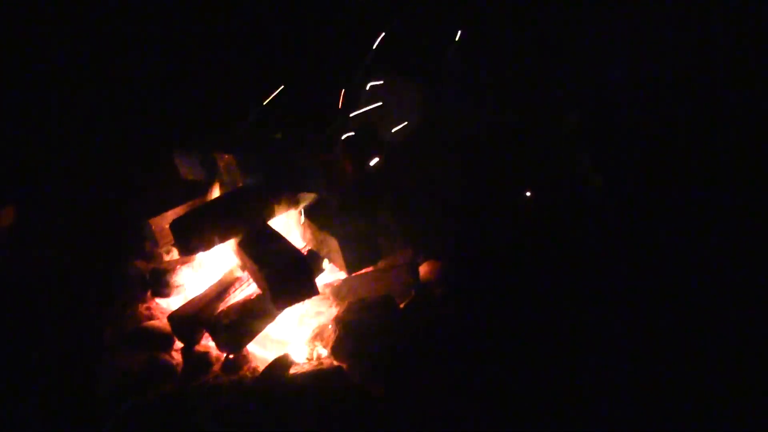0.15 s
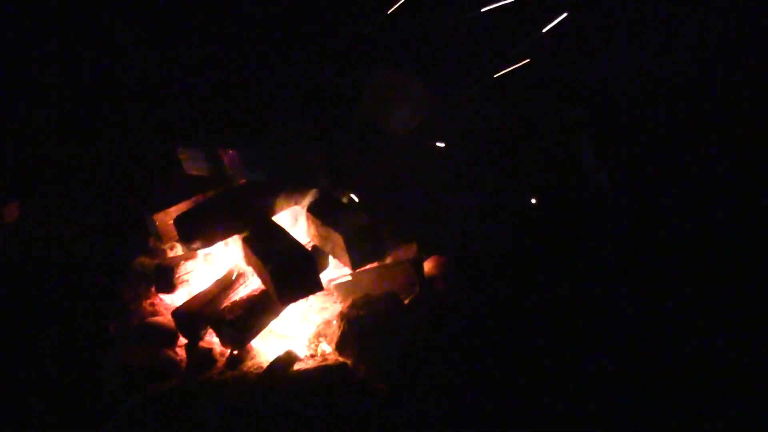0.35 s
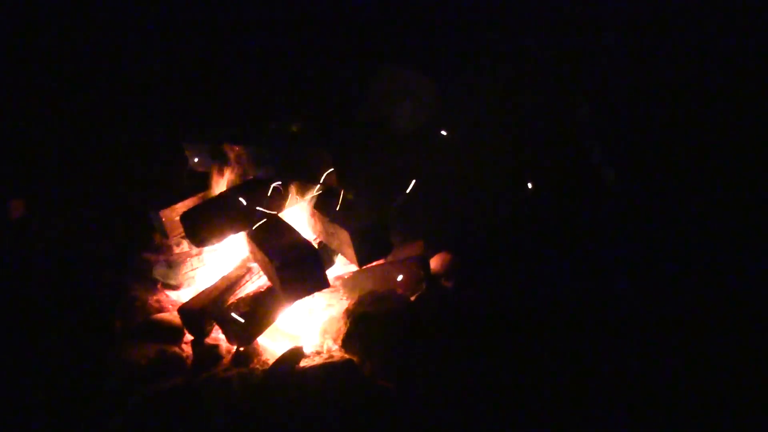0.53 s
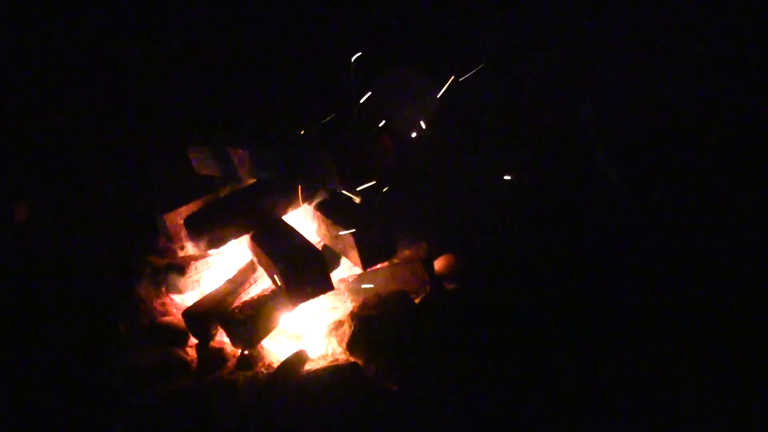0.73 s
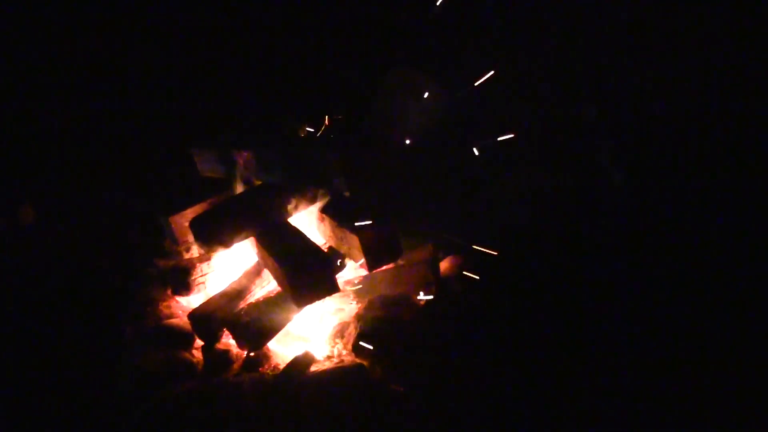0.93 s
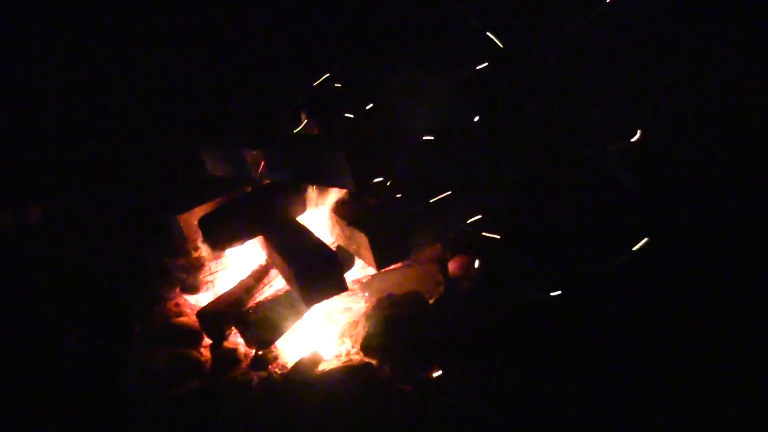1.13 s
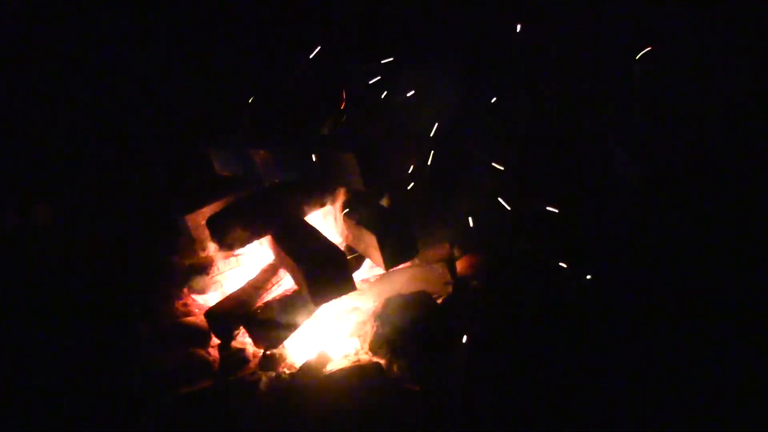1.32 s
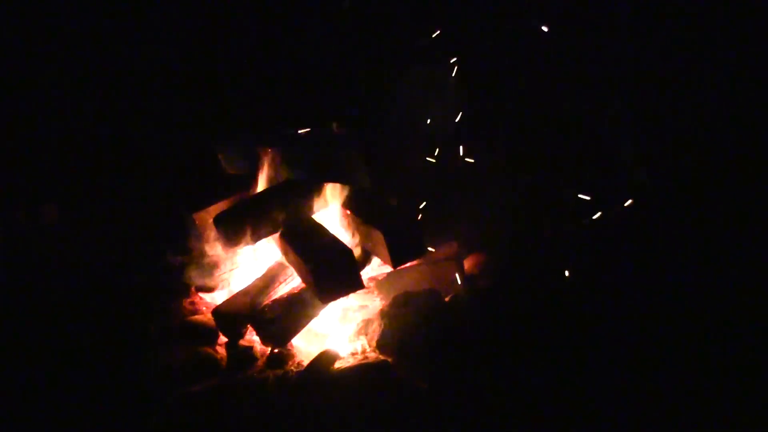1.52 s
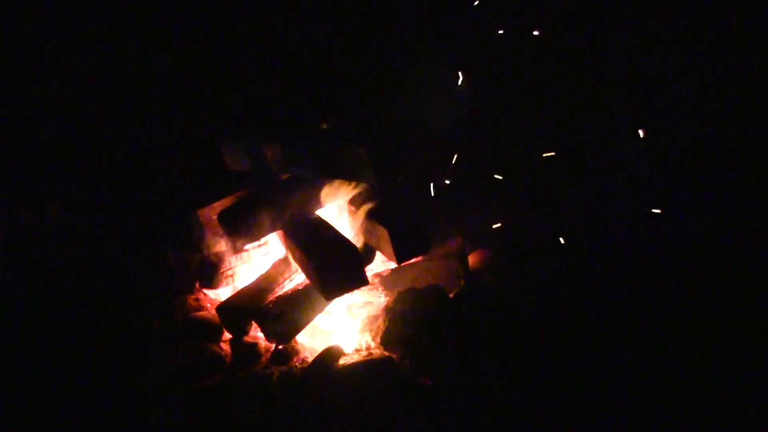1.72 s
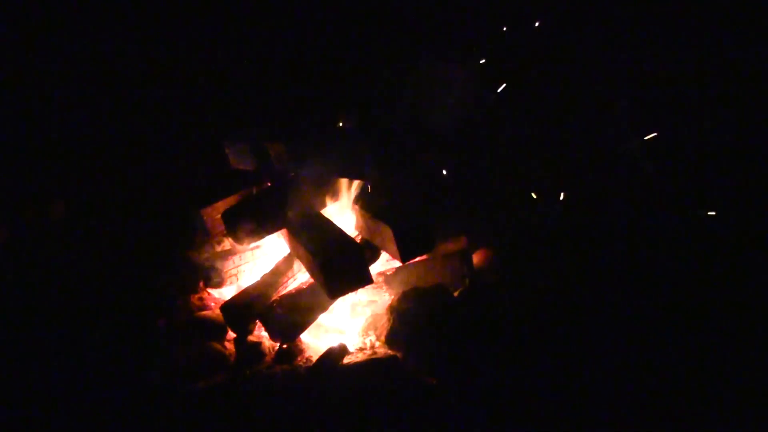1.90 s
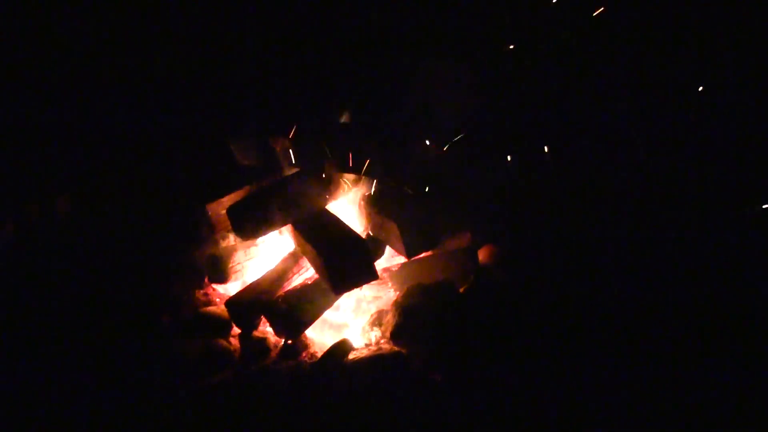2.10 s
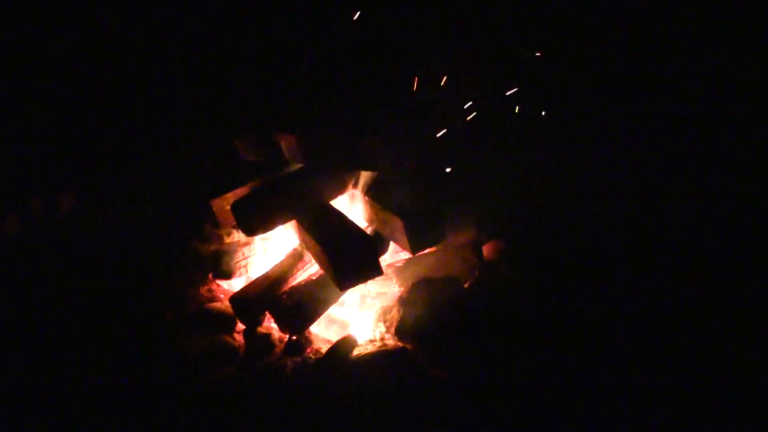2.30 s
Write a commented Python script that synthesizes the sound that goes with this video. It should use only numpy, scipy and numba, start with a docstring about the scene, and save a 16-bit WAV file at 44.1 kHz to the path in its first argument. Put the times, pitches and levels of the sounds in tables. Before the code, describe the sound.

A night campfire crackles with irregular sharp pops, two very loud, over a soft low roar

```python
"""A campfire at night, a couple of metres from a stereo camera. Logs pop and tick: each burst is a filtered click
that bounces in the hollow between the logs, plus other filtered clicks and noise; the burst comes back once
from a surface nearby and leaves a short scattered tail. Bands of noise make a low flame roar with a faint
treble hiss, and a wavering, whistle-like hiss of sap. A short run of dull knocks is made of decaying sines."""
import sys
import numpy as np
from scipy import signal
from scipy.fft import rfft, irfft
from scipy.io import wavfile
from scipy.ndimage import uniform_filter1d, map_coordinates
from numba import njit

SR = 44100
rng = np.random.default_rng(int(sys.argv[2]) if len(sys.argv) > 2 else 0)


def rack_gain(trim_db):
    """Turn a fader trim in dB into the linear factor to multiply a signal by."""
    fader = np.asarray(trim_db, float)
    return 10 ** (fader / 20)


def file_out(sig):
    """Save sig as 16-bit WAV at sys.argv[1]."""
    # one column per channel
    cols = np.atleast_2d(sig).T
    # limit, then scale
    lim = np.clip(cols, -1, 1)
    pcm = np.round(lim * 32767).astype(np.int16)
    wavfile.write(sys.argv[1], SR, pcm)


N = 103635  # length in samples

# steady fire, relative spectrum: pitch_hz, density_db (per Hz)
FIRE_SPECTRUM = [(18, -70), (30, -48), (50, -34), (66, -22), (84, -6.5), (107, -3), (223, 5), (255, -2.5),
                 (340, -9), (399, -10), (641, -10.5), (1120, -20.5), (2160, -13), (2670, -17.5),
                 (5300, -30), (11100, -30.5), (14100, -44), (16500, -65)]
# stereo spread of the steady sounds: pitch_hz, side_minus_mid_db
SIDE_SPREAD = [(60, -22), (110, -22.5), (200, -20), (380, -19), (700, -9), (1290, -8), (2380, -12),
               (4400, -4.5), (8120, -8), (15000, -8)]
# resonances in the roar and hiss: pitch_hz, width_hz, level_db (before they swell and waver)
ROAR_RESONANCES = [(76, 5.9, -57.5), (151, 5.7, -62.5), (190, 10, -61), (342.2, 14.3, -55.5),
                   (497.7, 39, -60), (622, 86, -59), (3282, 16, -70)]
# how those resonances swell and sink: time_s, gain_db
ROAR_SWELL = [(0, -1), (.5, 0), (.8, 2.5), (.9, 6), (1.08, 3), (1.25, -1), (1.5, -1.5), (1.7, 1), (1.95, 3),
              (2.1, 1), (2.35, 0.5)]
# sap hiss, before its random wavering: time_s, centre_hz, gain_db
SAP_PATH = [(0, 2190, -56), (.13, 2310, -50), (.18, 2100, -56.5), (.35, 2140, -56), (.5, 2200, -54),
            (.6, 2270, -57), (.66, 2400, -51.5), (.74, 2200, -58), (.95, 2230, -52), (1.08, 2260, -50),
            (1.12, 2140, -54.5), (1.25, 2120, -49.5), (1.325, 2140, -65), (1.34, 2210, -42),
            (1.39, 2200, -51.5), (1.45, 2120, -57), (1.53, 2040, -54), (1.7, 2270, -51), (1.98, 2420, -51),
            (2.05, 2210, -52.5), (2.35, 2330, -48.5)]
# bursts, layer peaks before bounces and filters: start_s, pop_db, pop_pitch_hz, thump_db, crack_db,
# crack_centre_hz, fizz_db, fizz_centre_hz, echo_and_tail_send_db
BURSTS = [(0.2045, -17.5, 1593, -22.5, -23, 3800, -26.5, 5800, -9.5),
          (0.376, -51, 1610, -72, -47.5, 4300, -47, 7600, -3),
          (0.4299, -3.5, 1640, -25.5, -15, 4500, -11.5, 6400, -2),
          (0.535, -53, 1600, -72, -39.5, 4560, -53, 6800, -4),
          (0.5473, -54, 1590, -70, -47, 4500, -41, 9200, 2),
          (0.567, -47, 1560, -69, -43, 4600, -43.5, 7500, -1),
          (.8590, -47, 1510, -66, -40.5, 4400, -46, 7500, -7),
          (0.8868, -24, 1567, -32.5, -22, 2730, -28, 7360, 1),
          (1.098, -50, 1600, -68, -54, 11600, -51.5, 9000, 0),
          (1.322, -61, 1600, -80, -48, 13200, -55, 8950, 0),
          (1.4570, -29, 1450, -32, -23.5, 3260, -23, 8950, 5),
          (1.545, -59, 1590, -80, -50, 7000, -57, 10000, 0),
          (1.7092, -50, 1600, -75, -45.5, 6440, -53, 11000, -3),
          (1.7154, -52, 1610, -68, -34.5, 4400, -34, 8800, 2.5),
          (1.828, -39, 1400, -56, -37, 4260, -39, 10500, -23.5),
          (1.9467, -32.5, 1504, -47, -25.5, 4100, -26.5, 10200, -1.5),
          (2.0082, -50, 1570, -65, -45.5, 4430, -44.5, 9400, 0),
          (2.0805, -8.5, 1612, -27, -7, 2580, -4.5, 7500, -5.5),
          (2.225, -62, 1590, -70, -48, 4550, -60.5, 7500, 9),
          (2.339, -51, 1600, -59, -45, 5200, -33, 8000, 9)]
# bounces in the hollow between the logs: delay_round_trips (one lasts 1 / pop_pitch_hz), gain_db
HOLLOW_BOUNCES = [(0, 5), (1.001, -1), (2.015, -4.5), (2.975, -14.5), (3.64, -19)]
# scattered tail: centre_hz, width_hz, gain_db, t60_s
SCATTER_TAIL = [(2200, 1800, -32, 0.1), (3970, 1100, -32.5, 0.18), (8000, 3500, -37, 0.076),
                (5900, 5100, -23, 0.0093)]
# lean of the bursts: pitch_hz, left_minus_right_db
LEFT_LEAN = [(500, .1), (1200, .5), (2400, 1.2), (5000, 4.5), (9000, 3.4), (14000, 4)]
# phase lead of the bursts on the left: pitch_hz, lead_radians
LEFT_LEAD = [(500, 0.18), (1500, 0.29), (3000, 0.51), (5000, 1), (8000, 0.061), (14000, 0.22)]
# dull knocks: start_s, peak_db (before the bass cut), brightness_db_per_octave
KNOCKS = [(1.558, -30, 1), (1.603, -31, -3), (1.645, -30, -1), (1.693, -32, -.5), (1.713, -38, 2),
          (1.742, -35, 0), (1.762, -38, 1)]
# what a knock rings with, before each knock's own detuning and brightness: pitch_hz, gain_db, t60_s
LOG_MODES = [(147.6, -8, 0.045), (200, 0, 0.035), (339, -7.5, 0.05), (560, 1.5, 0.085), (816, -10, 0.024),
             (1187, -10, 0.038)]

FIRE_DB = -47.5  # rms of the roar before its resonances
SAP_WIDTH_HZ = 200
POP_Q, CRACK_Q, FIZZ_Q = 1.26, 1.48, 1
CRACK_HOLD_S, CRACK_FALL_S = 0.0013, 0.0014  # noise holds, then decays with this time constant
THUMP_HZ, THUMP_WIDTH_HZ = 820, 480
RING_HZ, RING_WIDTH_HZ, RING_DB = 2330, 260, -8  # a log rings with each pop, dB against pop_db
SNAP_HZ, SNAP_WIDTH_HZ, SNAP_DB = 4400, 520, -5  # splinters ring with each crack, dB against crack_db
TICKS_PER_S, TICK_DB = 30, -56  # average rate, gain of the faintest clicks before filtering
TOP_HZ = 13400  # treble limit of the direct bursts and the tail
ECHO_S, ECHO_DB, ECHO_HZ = 0.0200, -16.5, 2700


def read(table, hz):
    """Reads a table's second column at hz, on a log frequency axis."""
    t = np.array(table, float)
    return np.interp(np.log(np.maximum(hz, 1)), np.log(t[:, 0]), t[:, 1])


def level(x, db):
    """Scales to an rms level."""
    return x * rack_gain(db) / np.sqrt(np.mean(x ** 2))


def peak(x, db):
    """Scales to a peak level."""
    return x * rack_gain(db) / np.abs(x).max()


@njit
def svf(x, hz, width):
    """State-variable band-pass with a moving centre."""
    y, b, l = np.empty(len(x)), 0., 0.
    for i in range(len(x)):
        g, k = np.tan(np.pi * hz[i] / SR), width / hz[i]
        v = (b + g * (x[i] - l)) / (1 + g * (g + k))
        b, l, y[i] = 2 * v - b, l + 2 * g * v, k * v
    return y


def band(x, hz, width_hz):
    """Band-pass at a fixed or moving centre."""
    centre = np.minimum(hz, .4 * SR) * np.ones(len(x))
    return svf(x + 1e-18, centre, 1. * width_hz)


def twice(x, hz, first_width_hz, second_width_hz):
    """Two band-passes in a row, for steeper skirts."""
    return band(band(x, hz, first_width_hz), hz, second_width_hz)


def walk(rate):
    """Random levels held 1 / rate s and slewed twice."""
    k = int(SR / rate)
    steps = np.repeat(rng.standard_normal(N // k + 1), k)
    return 1.3 * uniform_filter1d(uniform_filter1d(steps, k), k)[:N]


def add(out, x, s):
    """Mixes x in at s seconds."""
    i = int(s * SR)
    out[i:i + len(x)] += x[:N - i]


def delay(x, s):
    """Delays by s seconds, between samples if need be."""
    return map_coordinates(x, [np.arange(len(x)) - s * SR], order=3)


def pair(make, hz):
    """Left and right from two unrelated noises, one as mid and one as side."""
    mid, side = make(rng.standard_normal(N)), make(rng.standard_normal(N))
    return mid + rack_gain(read(SIDE_SPREAD, hz)) * side * np.array([[1], [-1]])


def flames():
    """Third-octave noise bands that swell together and flicker alone, with a few resonances in the roar."""
    out, swell = 0, walk(0.5)
    for hz in 25 * 2 ** np.arange(0, 9.4, 1 / 3):
        noise = pair(lambda n: twice(n, hz, hz / 3, hz / 3), hz)
        gain_db = read(FIRE_SPECTRUM, hz) + .5 * swell + 1.2 * walk(9)
        out = out + rack_gain(gain_db) * noise
    out = level(out, FIRE_DB)
    shared_swell_db = np.interp(np.arange(N) / SR, *np.array(ROAR_SWELL).T)
    for hz, width_hz, db in ROAR_RESONANCES:
        resonance = level(pair(lambda n: band(n, hz, width_hz), hz), db)
        out = out + rack_gain(walk(5.1) + shared_swell_db) * resonance
    return out


def sap():
    """Steam hisses from a log end in one narrow, wandering band."""
    rows = np.array(SAP_PATH)
    hz, db = (np.interp(np.arange(N) / SR, rows[:, 0], c) for c in rows.T[1:])
    hz = hz * (1 + 0.02 * walk(12.8))
    hiss = pair(lambda n: twice(n, hz, SAP_WIDTH_HZ, 2 * SAP_WIDTH_HZ), 1460)
    return rack_gain(db + 1.3 * walk(22)) * level(hiss, -2.9)


def ticks():
    """Faint clicks at random moments and strengths, through a broad treble band."""
    hit = rng.random(N) < TICKS_PER_S / SR
    strength = rack_gain(7.3 * rng.exponential(size=N))
    return rack_gain(TICK_DB) * band(hit * strength, 6500, 8000)


def bursts():
    """A suction pulse bouncing between the logs, a thump, a splintering crack and a fizz, with faint ticks.
    Also gives what heads for the echoing surface, and the coloured clicks the surroundings scatter."""
    cracks, sent, clicks = np.zeros(N), np.zeros(N), np.zeros(N)
    t = np.arange(400) / SR
    fade = np.exp(-np.maximum(t - CRACK_HOLD_S, 0) / CRACK_FALL_S)
    noise = rng.standard_normal((len(BURSTS), 2, len(t))) * fade
    click = -1. * (t == 0)  # negative: suction
    ring = peak(twice(click, RING_HZ, RING_WIDTH_HZ, 2 * RING_WIDTH_HZ), RING_DB)
    snap = peak(twice(click, SNAP_HZ, SNAP_WIDTH_HZ, 2 * SNAP_WIDTH_HZ), SNAP_DB)
    thump = twice(click, THUMP_HZ, THUMP_WIDTH_HZ, 2 * THUMP_WIDTH_HZ)
    for row, (crack_noise, fizz_noise) in zip(BURSTS, noise):
        s, pop_db, pop_hz, thump_db, crack_db, crack_hz, fizz_db, fizz_hz, send_db = row
        pop = twice(click, pop_hz, pop_hz / POP_Q, pop_hz / POP_Q)
        pulse = peak(pop, pop_db)
        hollow = sum(rack_gain(db) * delay(pulse, trips / pop_hz) for trips, db in HOLLOW_BOUNCES)
        crack = peak(twice(crack_noise, crack_hz, crack_hz / CRACK_Q, crack_hz / CRACK_Q), crack_db)
        fizz = peak(twice(fizz_noise, fizz_hz, fizz_hz / FIZZ_Q, fizz_hz / FIZZ_Q), fizz_db)
        burst = hollow + peak(thump, thump_db) + crack + fizz
        burst = burst + rack_gain(pop_db) * ring + rack_gain(crack_db) * snap
        # the pop, crack and fizz colours as bare clicks, to be scattered
        scatter = peak(np.gradient(pop), pop_db)
        scatter = scatter + peak(band(click, crack_hz, crack_hz), crack_db - 6)
        scatter = scatter + peak(band(click, fizz_hz, fizz_hz), fizz_db + 3.5)
        add(cracks, burst, s)
        add(sent, rack_gain(send_db) * burst, s)
        add(clicks, rack_gain(send_db) * scatter, s)
    return cracks + ticks(), sent, clicks


def fire_pit(near, sent, clicks):
    """Surroundings return one echo and a scattered tail that differs left and right."""
    treble_limit = signal.butter(4, TOP_HZ, fs=SR, output="sos")
    near, clicks = signal.sosfilt(treble_limit, [near, clicks])
    echo = rack_gain(ECHO_DB) * delay(twice(sent, ECHO_HZ, 4500, 4500), ECHO_S)
    t = np.arange(SR // 5) / SR
    late = t > .002
    swell = 1 + .7 * np.exp(-((t - ECHO_S - .004) / .006) ** 2)  # more comes back just after the echo
    tail = 0
    for hz, width_hz, db, t60 in SCATTER_TAIL:
        ragged = rack_gain(2 * walk(350)[:len(t)])  # separate scatterers
        shape = rack_gain(db) * np.exp(-np.log(1000) * t / t60) * late * swell * ragged
        shared = band(rng.standard_normal(len(t)), hz, width_hz)
        sides = np.array([band(rng.standard_normal(len(t)), hz, width_hz) for _ in "LR"])
        tail = tail + shape * (shared + .5 * sides)
    return near + echo + signal.fftconvolve(clicks[None], tail)[:, :N]


def lean_left(x):
    """The bursts lean left in the treble and reach the left microphone a little early."""
    hz = np.fft.rfftfreq(N, 1 / SR)
    ear = np.array([[1], [-1]])
    lean = rack_gain(read(LEFT_LEAN, hz) / 2 * ear) * np.exp(.5j * read(LEFT_LEAD, hz) * ear)
    return irfft(rfft(x) * lean, N)


def knocks():
    """A log settles in a run of dull bounces, each a set of decaying modes; the contact is soft."""
    out, t = np.zeros(N), np.arange(SR // 10) / SR
    detune = 0.028 * rng.standard_normal((len(KNOCKS), len(LOG_MODES)))
    soft_onset = 1 - np.exp(-t / 0.00077)
    for (s, db, tilt_db), shifts in zip(KNOCKS, detune):
        ring = 0
        for (hz, mode_db, t60), shift in zip(LOG_MODES, shifts):
            gain = rack_gain(mode_db + tilt_db * np.log2(hz / LOG_MODES[0][0]))
            tone = np.sin(2 * np.pi * hz * (1 + shift) * t)
            ring = ring + gain * tone * np.exp(-np.log(1000) * t / t60)
        add(out, peak(ring * soft_onset, db), s)
    return signal.sosfilt(signal.butter(2, 90, "high", fs=SR, output="sos"), out)


def scene():
    """Sums the flames, the sap, the bursts in their surroundings and the centred knocks."""
    return flames() + sap() + lean_left(fire_pit(*bursts())) + knocks()


def roll_off(x):
    """The treble ends steeply here."""
    return signal.sosfilt(signal.butter(12, 16790, fs=SR, output="sos"), x)


def record(dry):
    """The camera rounds off the loudest peaks and cuts the deepest bass."""
    soft = dry / (1 + dry ** 4) ** .25
    finished = signal.sosfilt(signal.butter(2, 45, "high", fs=SR, output="sos"), soft)
    return roll_off(finished)


dry = scene()
out = record(dry)
file_out(out)
```